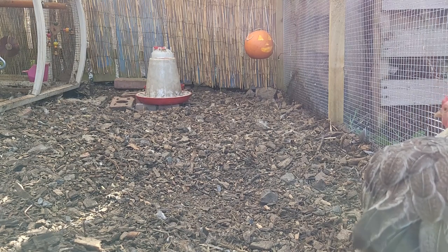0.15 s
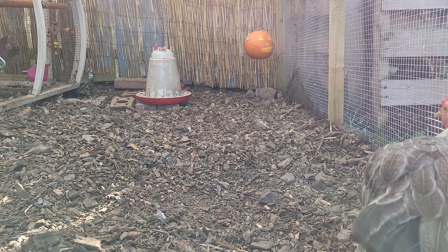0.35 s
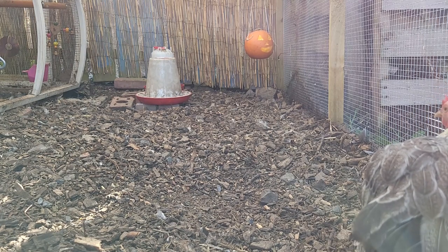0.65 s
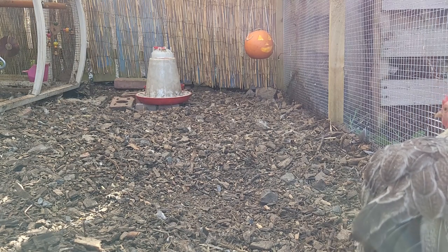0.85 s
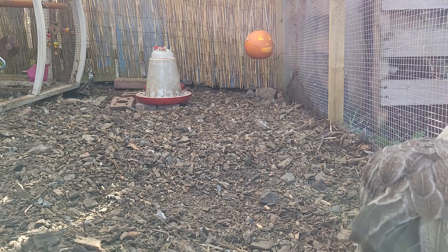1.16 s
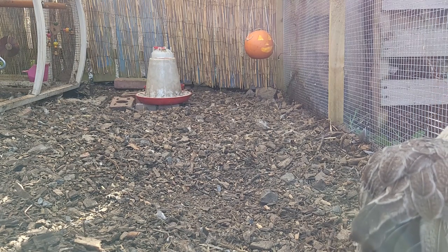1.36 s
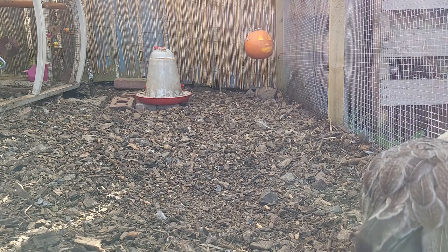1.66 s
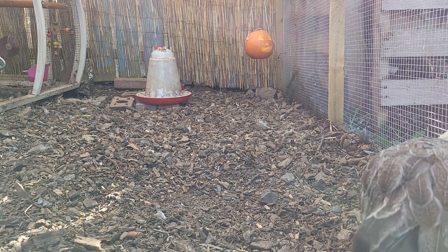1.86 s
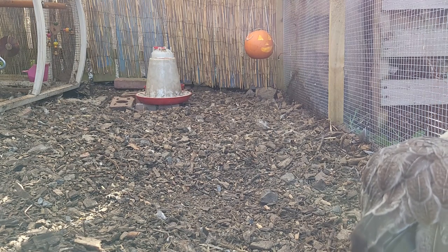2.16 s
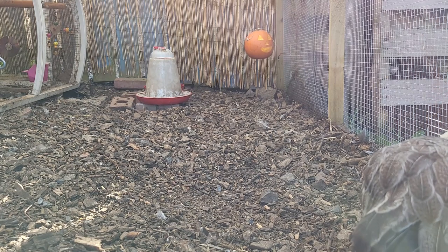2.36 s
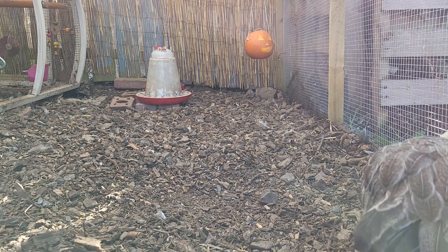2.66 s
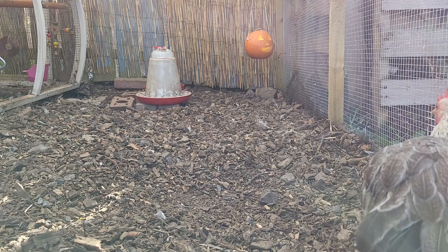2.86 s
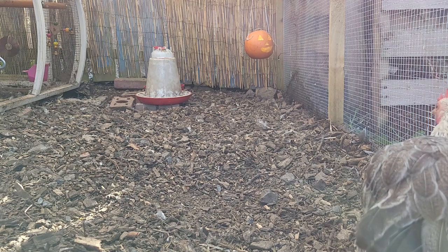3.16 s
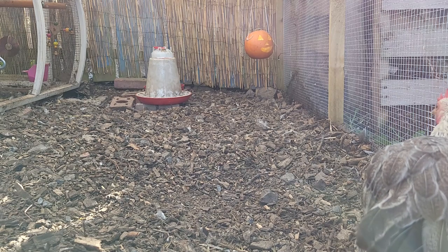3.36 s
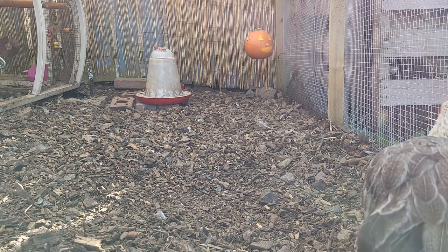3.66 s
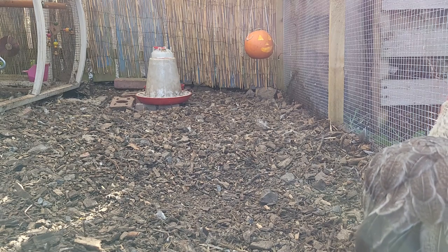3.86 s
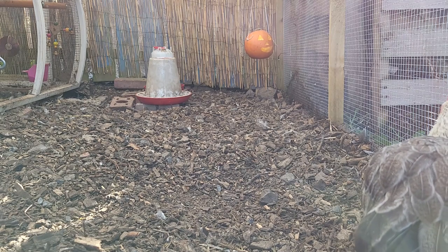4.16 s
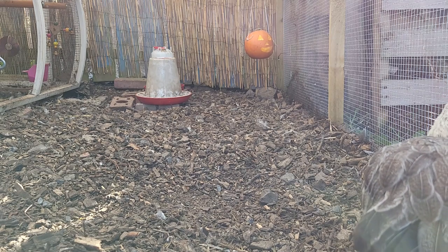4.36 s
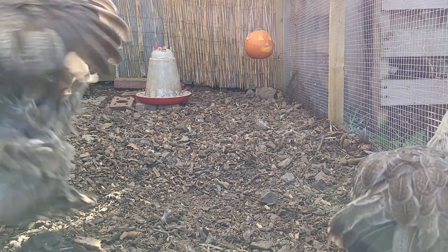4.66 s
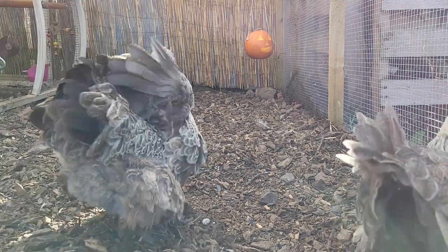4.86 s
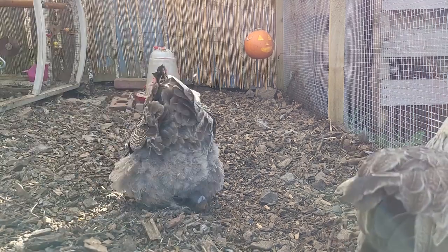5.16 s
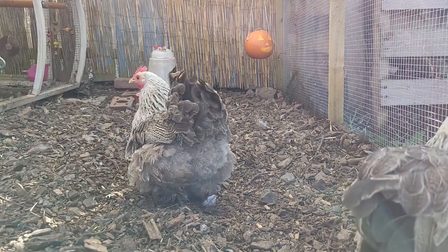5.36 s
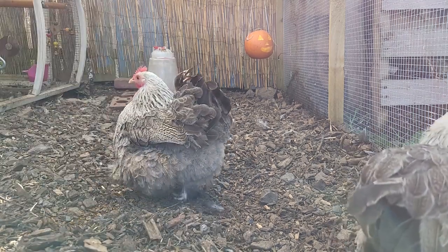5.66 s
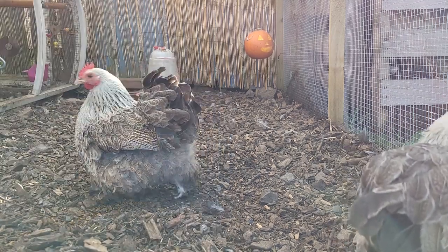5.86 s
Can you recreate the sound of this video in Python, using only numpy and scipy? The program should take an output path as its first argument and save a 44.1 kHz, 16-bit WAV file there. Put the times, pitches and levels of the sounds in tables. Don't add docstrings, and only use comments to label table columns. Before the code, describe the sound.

Thin trilling hen calls over faint hum and distant traffic, dry rustling on wood chips, then a sudden loud wing flurry and wind thump.

```python
import sys
import numpy as np
from scipy import signal
from scipy.fft import rfft, irfft
from scipy.io import wavfile
from scipy.ndimage import uniform_filter1d

SR = 44100
rng = np.random.default_rng(int(sys.argv[2]) if len(sys.argv) > 2 else 0)


def rack_gain(trim_db):
    fader = np.asarray(trim_db, float)
    return 10 ** (fader / 20)


def dump(signal):
    limited = np.clip(np.atleast_2d(signal).T, -1, 1)
    pcm = np.round(limited * 32767).astype(np.int16)
    wavfile.write(sys.argv[1], SR, pcm)


N = 265482
T = np.arange(N) / SR
HZ = np.fft.rfftfreq(N, 1 / SR)

# (frequency [Hz], level [dB per Hz])
FEATHER = [(120, -33), (200, -0.5), (232, -7.5), (289, -4.5), (322, -7), (659, -12), (763, -13),
           (1560, -20), (2090, -19.5), (2910, -26.5), (3690, -25), (4520, -22), (7140, -19.5), (8740, -27),
           (16000, -22)]
EDGES_HZ = (200, 1300, 4000, 8200, 16500)
# (frequency [Hz], level [dB per Hz])
EDDY = [(25, -44.5), (45, 1), (60, 2.5), (100, -6.5), (180, -7.5), (300, -15.5), (600, -30), (1000, -46),
        (1600, -68.5)]
# (frequency [Hz], likeness [0..1])
NEAR_LIKE = [(200, .97), (700, .9), (1200, .75), (2600, .55), (3500, .2), (16000, .1)]
NEAR_LAG_S = .00031

TRILL_START_S, TRILL_END_S, TRILL_FADE_S = .765, 1.12, .22
TRILL_HZ, TRILL_SLOWS_HZ_PER_S = 14.17, 18.4
TRILL_SWING_HZ, TRILL_DIP_DB = 28, 6


def read(table, low=None):
    s, *columns = np.transpose(table)
    return [uniform_filter1d(np.interp(T, s, c, low, low), size=200) for c in columns]


def on_hz(table):
    hz, value = np.transpose(table)
    return np.interp(np.log(HZ + 1), np.log(hz), value)


def edge(hz):
    return 1 / (1 + (HZ / hz) ** 12)


def noise(gain, like=0., lag_s=0.):
    mid, side = rfft(rng.standard_normal((2, N)))
    mid = mid * np.sqrt(1 + like)
    side = side * np.sqrt(1 - like)
    late = np.exp(-2j * np.pi * HZ * lag_s)
    x = irfft(gain * np.array([mid + side, (mid - side) * late]), N)
    return x / np.sqrt(np.mean(x ** 2))


def walk(rate):
    k = int(SR / rate)
    held = np.repeat(rng.standard_normal(N // k + 1), k)
    return 1.03 * uniform_filter1d(uniform_filter1d(held, k), k)[:N]


def sides(pan_db):
    return rack_gain(np.array([pan_db, -pan_db]) / 2)


def yard():
    # (frequency [Hz], level [dB per Hz])
    colour = [(15, -33), (30, -22.5), (45, -13.5), (70, -6.5), (120, -17), (200, -22.5), (400, -32.5),
              (600, -36.5), (780, -36), (1000, -33.5), (1500, -43), (2300, -55.5), (4000, -59),
              (8000, -67.5)]
    # (frequency [Hz], likeness [-1..1])
    likeness = [(60, 0.95), (130, 0.92), (290, 0.84), (640, 0.0078), (1410, -0.37), (3100, 0.011),
                (6820, -0.15), (15000, -0.068)]
    # (frequency [Hz], left minus right [dB])
    pan = [(60, -0.5), (110, 3), (200, 0.5), (380, 1.5), (700, 2.5), (1290, 6), (2380, 4), (4400, -1),
           (8120, -3), (15000, -8)]
    spectra = rfft(noise(rack_gain(on_hz(colour)), np.clip(on_hz(likeness), -.99, .99)))
    spectra = spectra * sides(on_hz(pan))
    out, below, together = 0, 0, walk(0.85)
    for hz in 45 * 2. ** np.arange(10):
        band = irfft(spectra * (edge(hz) - below), N)
        out = out + band * rack_gain(0.84 * together + 2.8 * walk(8))
        below = edge(hz)
    return rack_gain(-49) * out


def hum():
    # (frequency [Hz], rms level [dB])
    harmonics = [(100., -42), (200., -61.5), (300., -72.5), (400., -73), (600., -88)]
    out = 0
    for hz, db in harmonics:
        order = hz / 100
        level = np.sqrt(2) * rack_gain(db + 0.36 * order * walk(5.5))
        out = out + level * np.sin(2 * np.pi * hz * T + 0.38 * order * walk(13))
    return out


def trill():
    t = np.maximum(T - TRILL_START_S, 0)
    reach = np.clip(t / 0.027, 0, 1) * np.clip((TRILL_END_S - T) / 0.1, 0, 1)
    wobble = -reach * np.cos(2 * np.pi * (TRILL_HZ * t - TRILL_SLOWS_HZ_PER_S / 2 * t ** 2))
    return wobble, np.exp(-np.maximum(t - .07, 0) / TRILL_FADE_S)


def warble(table, pan_db, closes, knee_hz, second_db, third_db):
    rest_hz, fifth_hz, shuts_db_per_hz = 782, 885, 1.1
    wobble, fade = trill()
    pitch, effort_db = read(table)[0], read(table, low=-150)[1]
    pitch = pitch + TRILL_SWING_HZ * wobble * fade
    held = (T > 1.125) & (T < 1.285)
    shake = np.where(held, .4, 1)
    hz = pitch * (1 + shake * (.004 * walk(45) + .012 * walk(300)))
    phase = 2 * np.pi * np.cumsum(hz) / SR

    first = effort_db - TRILL_DIP_DB * np.maximum(wobble, 0) ** 4
    climb = closes * (pitch - rest_hz)
    second = first + second_db - climb - np.clip(shuts_db_per_hz * (pitch - knee_hz), 0, 17)
    third = first + third_db - climb / 2 + 6 * held
    fifth = first + third_db - 5 - np.abs(fifth_hz - pitch) / 6
    voice = 0
    for k, (order, db) in enumerate(zip((1, 2, 3, 5), (first, second, third, fifth))):
        level = np.sqrt(2) * rack_gain(db + shake * (3 + .7 * k) * walk(60))
        jitter = .2 * min(k, 2) ** 3 * shake * walk(150)
        voice = voice + level * np.sin(order * phase + jitter)
    voice = voice + rack_gain(-14) * np.roll(voice, int(.021 * SR))
    return sides(pan_db)[:, None] * np.array([np.roll(voice, int(0.00039 * SR)), voice])


def hen():
    # (time [s], pitch [Hz], effort [dB])
    short = [(0, 723, -48.5), (.05, 760, -57), (.075, 780, -48.5), (.135, 767, -50), (.148, 880, -55),
             (.166, 945, -53.5), (.176, 1090, -57), (.19, 1174, -51.5), (.235, 1124, -77)]
    body = [(.7, 908, -58), (.735, 896, -78), (.772, 803, -58), (.86, 795, -54.5), (1.04, 823, -53),
            (1.11, 845, -49), (1.14, 822, -50), (1.25, 820, -49)]
    flourish = [(1.29, 843, -46), (1.315, 916, -51.5), (1.337, 1010, -56), (1.36, 928, -50),
                (1.39, 872, -45.5), (1.42, 874, -47.5), (1.44, 952, -43.5), (1.452, 960, -80)]
    end = [(1.43, 1162, -92), (1.442, 1183, -63), (1.463, 1171, -61), (1.472, 930, -65), (1.49, 884, -98)]
    out = warble(short, -6.5, closes=.028, knee_hz=1130, second_db=-4, third_db=-38)
    out = out + warble(body + flourish, -5, closes=.09, knee_hz=826, second_db=-8, third_db=-36)
    return out + warble(end, -18.5, closes=.07, knee_hz=900, second_db=-8, third_db=-35)


def bursts(table, rise_s, t60, tail_db):
    band_decay = np.reshape((1., .85, .72), (3, 1, 1))
    power = np.zeros((3, 2, N))
    for s, db, mid_db, top_db, pan_db in table:
        at = int(s * SR)
        t = T[:min(N - at, SR // 2)]
        fall = 1e-6 ** (t / max(t60, .01) / band_decay)
        tail = rack_gain(2 * tail_db) * 1e-6 ** (t / .45)
        shape = (1 - np.exp(-t / rise_s)) ** 2 * (fall + tail)
        peak = rack_gain(2 * (db - 6.0 + np.array([mid_db, 0, top_db])))
        power[:, :, at:at + len(t)] += np.outer(peak, sides(2 * pan_db))[:, :, None] * shape
    return power


def plumage():
    # (time [s], peak at 4-8 kHz [dB], 1.3-4 kHz relative [dB],
    # above 8 kHz relative [dB], left minus right [dB])
    rustles = [(0.626, -47.5, 5.5, 4, -5), (0.822, -67, 6, -35, 4), (1.2731, -68, 12.5, -2, -1),
               (1.3932, -63.5, -8, 5.5, -3), (1.8688, -69, -4, 1, -5), (1.9237, -65, 4.5, -10, 1),
               (2.0378, -66, 5, -24, -2), (2.1475, -60.5, -7, -15, -2), (2.17, -54, -5.5, -0.5, -2),
               (2.631, -49, 0.5, -12, 2), (2.639, -54, -3.5, 0, -1.5), (3.3608, -64, -23, 0.5, -19),
               (3.472, -42.5, -2, -29, 1.5), (3.6386, -49, 3, -14, 0.5), (3.745, -46, -16, -17, -2),
               (3.826, -48.5, -25, -12, -3), (4.333, -51, 9.5, -10, 2), (4.495, -36.5, 2.5, 2, 0.5),
               (4.664, -38, -3, -6.5, 0.5), (4.719, -31.5, 2, -8.5, -1.5), (4.743, -24.5, -2, -8, -2),
               (5.05, -59, -14, -8, 0), (5.129, -55, -8, -10.5, 1.5), (5.176, -53.5, -15, -15, -2)]
    swishes = [(3.45, -57, -8, -15, 0), (3.612, -55.5, -18, 0, -3), (4.27, -52.5, 1, -8, 0),
               (4.375, -47.5, 10.5, -16, .5), (4.425, -35, -2, 1, 1.5), (4.54, -33.5, 0, -1.5, 2),
               (4.605, -35.5, 8, 0.5, -1), (4.635, -27.5, 1.5, -1, 0.5), (4.795, -46.5, 4.5, -8, 5),
               (4.85, -54, 3, -8, 0), (4.97, -60, -12, -1, 0)]
    preens = [(1.02, -55.5, -10, -1, 0), (2.9, -57.5, -17, -12, -3), (3.1, -58.5, -23, 1, -6),
              (3.18, -56, -22, -8, -5), (3.585, -62, -20, 10.5, -8.5), (3.645, -59, -3, -1.5, -3),
              (3.94, -55.5, -13, -23, -5)]
    ticks = [(0.6334, -48.5, 12.5, -3, 9), (3.4814, -45, -8, -5, -8), (3.6601, -50.5, -15, -17, -4),
             (4.4972, -31.5, -17, 3, -2.5), (4.6154, -35.5, -6.5, -8, 2.5),
             (4.6443, -20.5, -3.5, -19.5, 2.5), (4.7183, -30.5, -1, -4, 0), (4.7457, -21, -3, 1, -1),
             (4.4409, -39, -13, -8, -2), (4.5322, -38, 5, -12, 0), (4.5581, -35, -17, -12, 2),
             (3.7435, -44, -14, -10, 2), (3.8235, -50, -15, -14, -3), (2.644, -50, 1, -6, 0),
             (2.652, -52.5, -4, -3, 0), (3.617, -54.5, -18, 0, -3), (3.751, -51, -4, -8, 0),
             (3.834, -50.5, -14, -10, -3), (3.86, -54, -14, -12, -3), (4.509, -35.5, -3, -2, 0),
             (4.449, -40.5, -1, -6, 0), (4.564, -35, -10, -8, 1), (4.753, -28.5, -1, -8, 0),
             (4.812, -44, 4, -8, 2)]
    specks = [(4.9255, -38, -16, -20, 0), (5.0235, -39, -13, -8, -3), (5.1025, -47.5, -22, 1, -5),
              (5.149, -48, -5, 0, -5), (5.2655, -48.5, -5.5, 0.5, -3.5), (5.328, -63, -15, 5, -6),
              (5.402, -57, -8, 0, -10), (5.5318, -61, -10, 7, -9), (5.608, -54, -23.5, 2, -8),
              (5.6894, -65, -14.5, 9, -8), (5.9783, -56, -17, -1, -8)]
    # (time [s], brushing plumage [dB])
    stir = [(0.0, -83), (0.37, -85.5), (0.8, -81), (1.78, -89), (2.58, -85), (3.14, -73), (3.86, -72.5),
            (4.12, -71.5), (4.34, -71.5), (4.58, -50), (4.66, -49.5), (4.81, -64), (5.06, -69), (5.18, -77),
            (5.37, -81.5), (6.02, -82)]

    strokes = bursts(rustles, 0.0045, 0.17, -20.5) + bursts(swishes, 0.011, 0.25, -10.5)
    strokes = strokes + bursts(preens, 0.01584, 0.39, -21)
    grit = np.repeat(np.minimum(rng.exponential(size=N // 32 + 1), 4), 32)[:N] - 1.8
    strokes = strokes * rack_gain(2 * (1.4 * walk(500) + 2 * walk(120) + 1.7 * walk(45) + 2.55 * grit))
    chips = bursts(ticks, 0.0007, 0.03, -22.5) + bursts(specks, 0.0004, 0.0097, -20)
    band_db = np.array([[-7], [0], [-6]])
    brushing = rack_gain(2 * (read(stir)[0] + band_db + 0.99 * walk(26) + 0.67 * walk(190)))
    power = strokes + chips + brushing[:, None] * sides(-7.0)[:, None]

    colour, like = rack_gain(on_hz(FEATHER)), on_hz(NEAR_LIKE)
    out = 0
    for p, lo, hi in zip(power, EDGES_HZ[1:], EDGES_HZ[2:]):
        out = out + np.sqrt(p) * noise(colour * np.sqrt(edge(hi) - edge(lo)), like, NEAR_LAG_S)
    return out


def rings():
    # (time [s], level [dB], frequency [Hz], t60 [s])
    resonances = [(.03, -75, 2300, .9), (.2, -73, 2300, 1.7), (.4, -75, 2400, 2.5), (.626, -47, 7500, .11),
                  (.628, -54, 13500, .069), (.63, -52, 2100, .1), (.631, -51, 480, .14),
                  (.7, -71, 2200, .9), (.84, -69, 2280, .3), (1.02, -70, 2400, .5), (.16, -69, 2000, .25),
                  (1.275, -70, 4450, .3), (2.172, -62, 7300, .1), (3.477, -53, 3600, .12),
                  (3.473, -54, 5400, .05), (3.645, -60, 4000, .08), (3.478, -58, 1740, .19),
                  (3.48, -51, 310, .17), (3.637, -55, 2180, .1), (3.643, -59, 1220, .12),
                  (3.65, -54, 320, .2), (3.744, -60, 4400, .1), (3.744, -57, 7400, .08),
                  (3.823, -55, 6100, .12), (3.823, -60, 3000, .04), (3.84, -66, 3000, .15),
                  (4.335, -48, 2500, .07), (4.338, -45, 3700, .04), (4.387, -46, 1900, .05),
                  (4.397, -43, 2000, .05), (4.421, -43, 1700, .045), (4.446, -46, 1800, .06),
                  (4.534, -43, 1800, .06), (4.534, -40, 480, .06), (4.572, -39, 480, .12),
                  (4.6205, -32, 13000, .012), (4.627, -35, 480, .1), (4.643, -35, 600, .05),
                  (4.659, -33, 420, .09), (4.727, -30, 400, .08), (4.744, -28, 520, .09),
                  (4.744, -36, 1050, .06), (4.63, -41, 1050, .2), (4.79, -47, 1400, .2),
                  (4.743, -32, 4500, .066), (4.744, -34, 2600, .096), (4.925, -45, 6700, .026),
                  (5.176, -61, 6000, .1), (4.98, -65, 6500, .3), (5.022, -54, 4300, .07),
                  (5.128, -60, 5900, .1), (5.134, -63, 3400, .06), (5.148, -53, 3300, .03)]
    out = np.zeros((2, N))
    scrape = rng.standard_normal((len(resonances), 2, SR // 4))
    t = T[:SR // 4]
    for (s, db, hz, t60), x in zip(resonances, scrape):
        width = min(460 * (hz / 1000) ** 0.337, 1.5 * hz)
        sos = signal.butter(2, [hz - width / 2, hz + width / 2], "band", fs=SR, output="sos")
        stroke = (1 - np.exp(-t / (0.016 * t60))) * 0.0013 ** (t / t60)
        stroke = stroke * np.cos(np.pi / 2 * t / t[-1])
        like = np.interp(hz, *np.transpose(NEAR_LIKE))
        right = like * np.roll(x[0], int(NEAR_LAG_S * SR)) + np.sqrt(1 - like ** 2) * x[1]
        ring = signal.sosfilt(sos, np.array([x[0], right]) * stroke)
        out[:, int(s * SR):int(s * SR) + len(t)] += rack_gain(db) * np.sqrt(SR / 2 / width) * ring
    return out * rack_gain(2.3 * walk(300))


def knocks(table):
    out = np.zeros(N)
    for s, db, hz, t60 in table:
        at = slice(int(s * SR) + 1, int((s + 2 * t60) * SR) + 2)
        t = T[at] - s
        push = np.sin(2 * np.pi * hz * t) * (1 - np.exp(-t * abs(hz) * 6))
        out[at] += rack_gain(db) * 2.6 * push * 0.00026 ** (t / t60)
    return out


def steps():
    # (time [s], peak [dB], frequency [Hz], t60 [s]); a foot on the ground
    feet = [
        (3.656, -32.5, 77.5, 0.056),
        (5.141, -33.5, 91, 0.1),
        (5.181, -38, 72.5, 0.088),
    ]
    quills = [(.634, -59, 2100, 0.0055), (3.482, -45.5, 3720, 0.011), (4.341, -40.5, 2950, 0.0076),
              (4.497, -27, 4960, 0.00081), (4.56, -32.5, 7750, 0.0029), (4.666, -29, 5070, 0.0028),
              (4.719, -42, 4050, 0.0023), (4.645, -35, 6500, .002), (4.498, -31.5, 16000, .002),
              (5.103, -48, 7700, .003), (1.274, -69, 2000, .05), (1.4, -66, 2350, .06),
              (1.273, -67, 2970, .05), (4.3885, -52, 1850, .01), (4.7185, -38, 5900, .003),
              (4.3985, -50, 1950, .012), (4.7458, -30, 1500, .006)]
    clap = [(4.7443, -23, 3730, .003), (4.7461, -14.5, 3850, .002), (4.7476, -20, 3000, .0025),
            (4.7462, -21, 11600, .0015), (4.7466, -24, 15200, .0015)]
    snaps = knocks(quills + clap)
    return knocks(feet) + np.array([snaps, np.roll(snaps, int(0.00026 * SR))])


def swell(s, db, rise, fall):
    return db - rise * np.maximum(s - T, 0) - fall * np.maximum(T - s, 0)


def wings():
    # (time [s], thump [dB], whoosh relative [dB])
    beats = [(4.33, -61, 3), (4.42, -43.5, -9), (4.47, -48, -1), (4.521, -38.5, -5.5), (4.568, -32, -6.5),
             (4.645, -28.5, -2.5), (4.69, -29.5, -17.5), (4.744, -34.5, 4.5), (4.86, -51, -6)]
    shove = np.sqrt(sum(rack_gain(2 * swell(s, db, 135, 143)) for s, db, _ in beats))
    sweep = np.sqrt(sum(rack_gain(2 * swell(s, db + rel_db, 410, 300)) for s, db, rel_db in beats))
    thump = noise(rack_gain(on_hz(EDDY)) * edge(171), 0.94)
    low_band = np.sqrt(edge(EDGES_HZ[1]) - edge(EDGES_HZ[0]))
    whoosh = noise(rack_gain(on_hz(FEATHER)) * low_band, on_hz(NEAR_LIKE), NEAR_LAG_S)
    return shove * thump + sweep * rack_gain(2 * walk(60)) * sides(2.6)[:, None] * whoosh


def puffs():
    # (time [s], length [s], right [dB], left [dB])
    table = [
        (4.892, .115, -18.5, -32),
        (5.018, .038, -22.5, -52),
        (5.335, .07, -52, -58),
        (5.51, .04, -52, -56),
    ]
    ports = []
    for s, length, right_db, left_db in table:
        stop = swell(s + length, 0, 0, 3000)
        ports.append([swell(s, left_db, 330, 200) + stop, swell(s, right_db, 700, 150) + stop])
    return np.max(ports, axis=0)


def gust():
    # (time [s], peak [dB], frequency [Hz], t60 [s]); negative Hz sucks first
    buffets = [(4.8745, -13.5, 162, 0.025), (4.8805, -12, 167, 0.022), (4.892, -7, 141, 0.02),
               (4.9025, 7, 91, 0.014), (4.9205, -12, 170, 0.017), (4.9235, -2, 65, 0.061),
               (4.961, -10, 56, 0.084), (5.0005, -7.5, 113, 0.024), (5.012, -1.5, -99, 0.016),
               (5.018, -5, 98, 0.022), (5.026, -2.5, 77, 0.032), (5.038, 1.5, 55, 0.026)]
    # (frequency [Hz], level [dB per Hz])
    roar_colour = [(120, -42.5), (200, 1), (400, -6.5), (700, -23), (1100, -38.5), (1700, -56)]
    db = puffs()
    eddies = rack_gain(db + 2.5 * walk(50)) * noise(rack_gain(on_hz(EDDY)) * edge(260))
    roar = rack_gain(1.5 * db + 8.5 + 2 * walk(90)) * noise(rack_gain(on_hz(roar_colour)))
    blows = rfft(knocks(buffets)) / (1 + (HZ / 450) ** 4) / (1 + (38 / (HZ + 1)) ** 4)
    blows = irfft(blows, N)
    flare = 0.5 + 3.0 * uniform_filter1d(np.abs(np.gradient(blows)) * SR / 700, size=260)
    return eddies + roar * np.array([np.ones(N), flare]) + np.outer([0, 1], blows)


def scene():
    # (time [s], gain [dB])
    gain = [(4.75, -2), (4.95, 1.5), (5.06, -3), (5.25, -6.5), (5.5, -5), (6.02, -6)]
    gain_db = read(gain)[0]
    ground = yard() * rack_gain(1.7 * gain_db) + hum() * rack_gain(gain_db)
    return ground + hen() + plumage() + rings() + wings() + steps() + gust()


def band_limit(x):
    return signal.sosfilt(signal.butter(12, 15950, fs=SR, output="sos"), x)


def record(dry):
    # (frequency [Hz], level [dB per Hz])
    hiss_colour = [(1000, -7.5), (3000, -6.5), (5000, -5), (7000, 1.5), (8300, -7), (9500, -4),
                   (13000, 5.5), (16000, 0)]
    # (start [s], end [s], left [dB], right [dB])
    bass_cut = [(5.06, 5.115, -2, -28), (5.195, 5.245, -10, -6), (5.25, 5.322, -2, -11),
                (5.413, 5.462, -1, -14), (5.47, 5.525, -16, -5)]
    hiss = noise(rack_gain(on_hz(hiss_colour)) * (1 - edge(900)))
    x = dry + rack_gain(-84.5) * sides(-2.7)[:, None] * hiss
    cut_db = sum(np.outer([left_db, right_db], (T > a) & (T < b)) for a, b, left_db, right_db in bass_cut)
    shut = np.sqrt(1 - uniform_filter1d(rack_gain(cut_db), size=180))
    x = x - shut * irfft(rfft(x * shut) * edge(210), N)
    x = np.tanh(x * .8) / .8
    x = signal.sosfilt(signal.ellip(6, .3, 30, 15950, fs=SR, output="sos"), x)
    return band_limit(x)


dry = scene()
out = record(dry)
dump(out)
```